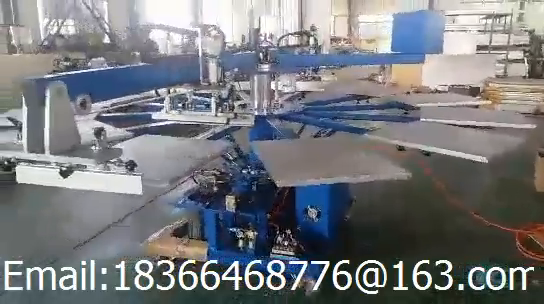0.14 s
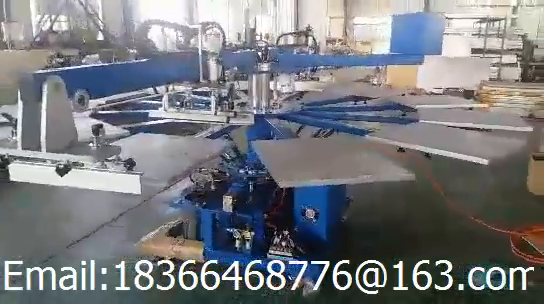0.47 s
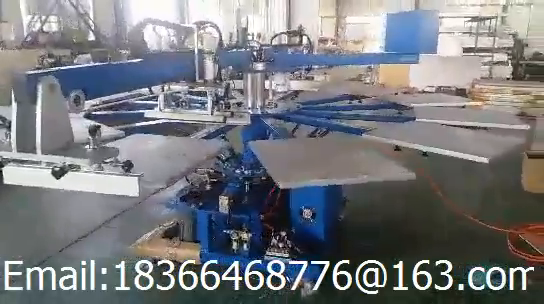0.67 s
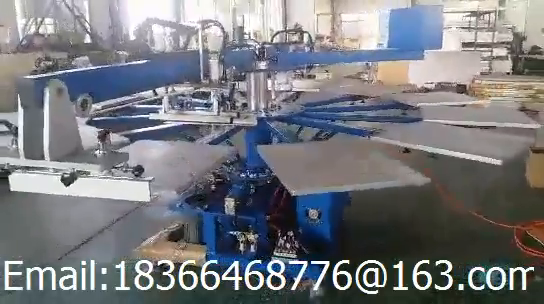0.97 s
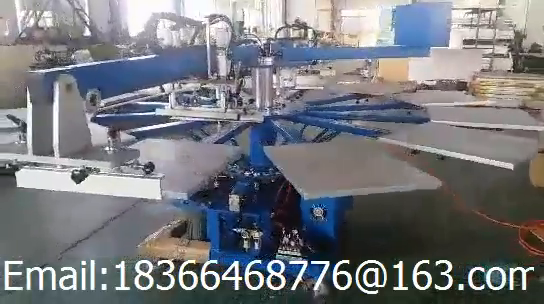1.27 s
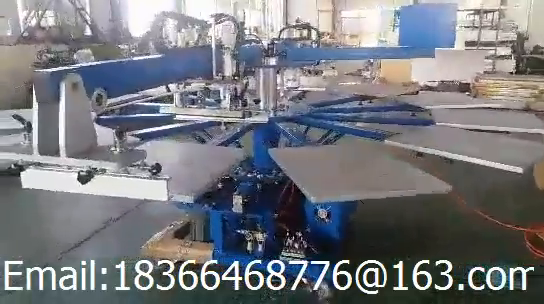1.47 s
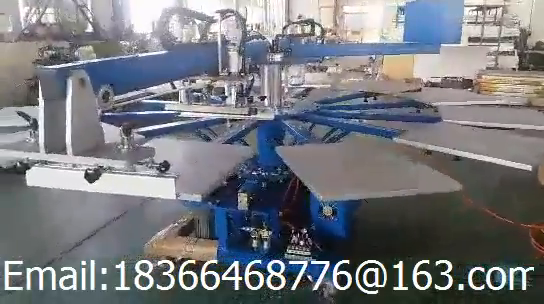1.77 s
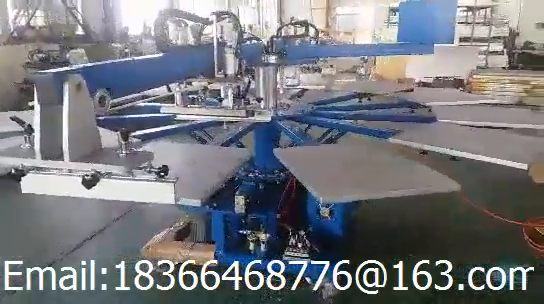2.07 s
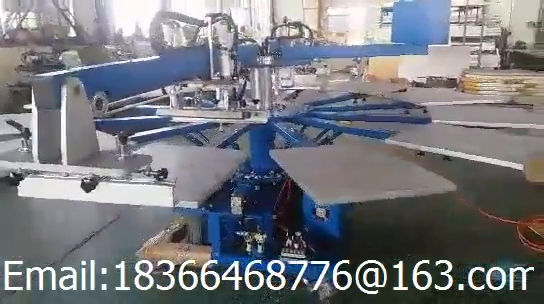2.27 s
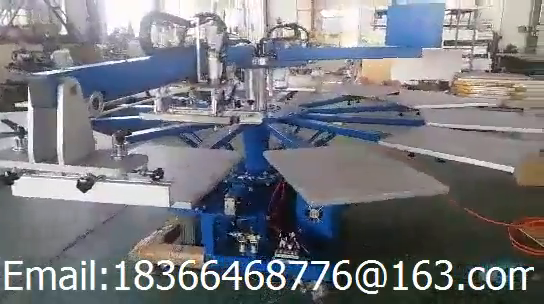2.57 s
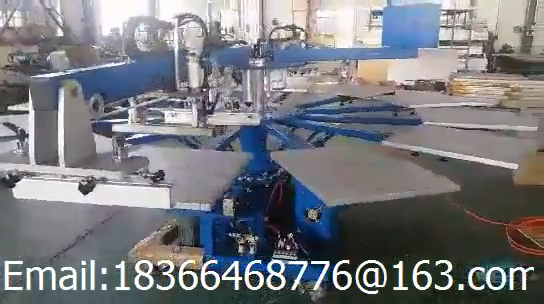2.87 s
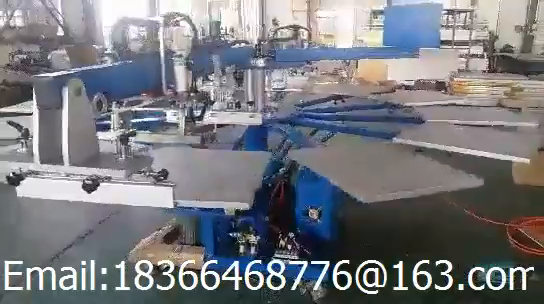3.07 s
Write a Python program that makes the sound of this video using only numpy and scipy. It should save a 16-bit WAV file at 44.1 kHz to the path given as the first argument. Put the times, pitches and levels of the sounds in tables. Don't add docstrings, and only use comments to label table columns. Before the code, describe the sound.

Compressed air from a pneumatic printing carousel bursts out after half a second of workshop roar, fades over about two seconds amid metal clunks, and ends with a sharp air spit; phone a few metres away.

```python
import sys
import numpy as np
from scipy import signal
from scipy.fft import rfft, irfft
from scipy.io import wavfile
from scipy.ndimage import uniform_filter1d, minimum_filter1d

SR = 44100
rng = np.random.default_rng(int(sys.argv[2]) if len(sys.argv) > 2 else 0)


def master_out(mix):
    frames = np.transpose(np.atleast_2d(mix))
    ceiling = np.clip(frames, -1, 1)
    pcm = np.round(ceiling * 32767).astype(np.int16)
    wavfile.write(sys.argv[1], SR, pcm)


def boost_factor(decibels):
    exponent = np.asarray(decibels, float) / 20
    return 10 ** exponent


N = 142002
T = np.arange(N) / SR
F = np.fft.rfftfreq(N, 1 / SR) + 1e-3

# start_s, level_db, nozzle_ring_db
JET = [
    (.4935, -19, 10),
    (.503, -18, 1),
    (.9, -19, 2),
    (1.17, -19, -2.5),
    (1.3, -21.5, -1),
    (1.63, -24.5, 1),
    (1.9, -33, -0.5),
    (2.1, -36.5, 3),
    (2.35, -55, -1),
]
NOTCH_HZ, NOTCH_WIDTH_HZ = 9250, 1500


def level(x, db):
    return x * boost_factor(db) / np.sqrt(np.mean(x ** 2))


def curve(table, col=1):
    points = np.array(table)
    return np.interp(T, points[:, 0], points[:, col])


def slope(table):
    points = np.array(table)
    return boost_factor(np.interp(np.log(F), np.log(points[:, 0]), points[:, 1]))


def ring(hz, width):
    return 1 / (1 + 2j * (F - hz) / width)


def ring_bank(modes):
    return sum(boost_factor(db) * ring(hz, width) for hz, width, db in modes)


def shape(x, gain):
    return irfft(rfft(x) * gain, N)


def walk(rate):
    k = int(SR / rate)
    steps = np.repeat(rng.standard_normal(N // k + 1), k)
    return 1.4 * uniform_filter1d(uniform_filter1d(steps, k), k)[:N]


def pair(alike_hz):
    mid, side = rng.standard_normal((2, N))
    side = shape(side, np.clip(F / alike_hz, .35, 1))
    return np.array([mid + side, mid - side])


def flicker(x, own_db, rate, all_db):
    out, swell = 0, walk(2.73)
    octave = np.clip(np.log2(F), 6, 14)
    for centre in np.arange(6, 15):
        band = np.clip(1 - np.abs(octave - centre), 0, 1)
        out = out + shape(x, band) * boost_factor(own_db * walk(rate) + all_db * swell)
    return out


def place(x, wet_db):
    # frequency_hz, left_lead_rad
    port_phase = [(500, 1.4), (2100, 0.74), (3100, 1.61), (5800, 1.2), (8600, 1.38), (10000, 4.44),
                  (13500, 7.5), (15800, 7.6)]
    t = T[:SR]
    noise = rng.standard_normal((2, 2, SR))
    dull = signal.lfilter([.25], [1, -.75], noise[0])
    tail = 2 * dull * boost_factor(-60 * t / 1) + noise[1] * boost_factor(-60 * t / .88)
    tail = tail * np.clip(t / .004, 0, 1)
    tail = tail / np.sqrt(np.sum(tail ** 2) / 2)
    wet = signal.fftconvolve(x[None], tail, axes=1)[:, :N]
    hz, lead = np.array(port_phase).T
    turn = np.exp(.5j * np.interp(np.log(F), np.log(hz), np.unwrap(lead)))
    return np.array([shape(x, turn), shape(x, 1 / turn)]) + boost_factor(wet_db) * wet


def hall():
    # frequency_hz, level_db (per Hz)
    hall_colour = [(60, -32.5), (692, -5.5), (742, -11), (1100, -10), (1720, -11.5), (4800, -28.5),
                   (9400, -34), (12700, -26), (15700, -26.5)]
    # start_s, level_db
    hall_level = [
        (0, -32),
        (.2, -29.5),
        (.49, -28.5),
        (.53, -36),
        (1.1, -30.5),
        (1.4, -30.5),
        (2.2, -27),
        (2.6, -28.5),
        (2.85, -29),
        (3.22, -30.5),
    ]
    # frequency_hz, width_hz, level_db
    hall_rings = [(1322, 80, 2.5), (1827, 170, -1.5), (2200, 64, -1.5), (892, 68, 3)]
    roar = level(shape(pair(890.0), slope(hall_colour)), 0)
    roar = roar + level(shape(pair(990.0), ring_bank(hall_rings)), -4)
    return flicker(roar, 1.24, 9.23, 0.15) * boost_factor(curve(hall_level))


def leak():
    # start_s, level_db, pitch_hz
    leak_course = [
        (0, -37, 11200),
        (.2, -35, 11250),
        (.5, -34.5, 11080),
        (1.9, -40.5, 11880),
        (2.15, -57, 12030),
        (3.22, -49, 12800),
    ]
    turn = 2 * np.pi * np.cumsum(curve(leak_course, col=2)) / SR

    def slow(width_hz):
        return level(shape(pair(3000.), np.exp(-(F / width_hz) ** 2)), 1.5)

    def band(width_hz):
        return slow(width_hz) * np.cos(turn) + slow(width_hz) * np.sin(turn)

    core, skirt = band(270), band(2500)
    return (core + boost_factor(1.5) * skirt) * boost_factor(curve(leak_course) + 0.27 * walk(27.0)) / 2


def hum():
    # pitch_hz, width_hz, level_db, start_s, end_s
    hum_tones = [
        (552, 20, -42, -1, 4),
        (649, 4, -36.5, 1.33, 2.42),
        (649, 12, -45, -1, 1.33),
        (649, 6, -42, 2.42, 4),
        (731, 4, -35, 2.77, 3.2),
        (788, 8, -46, -1, 4),
        (414, 5, -52, -1, 4),
        (300, 8, -53, -1, 4),
    ]
    out = 0
    for hz, width, db, start, end in hum_tones:
        phase = 2 * np.pi * np.cumsum(hz + width / 3 * walk(30.)) / SR
        tone = np.sin(phase + np.array([[0], [.6]])) * boost_factor(3 * walk(20.))
        out = out + level(tone, db) * np.clip((T - start) / 0.089, 0, 1) * np.clip((end - T) / 0.045, 0, 1)
    return out


def jet():
    # frequency_hz, level_db (per Hz)
    jet_colour = [(290, -64), (500, -39), (553, -28), (903, -34), (985, -20), (2240, -5.5), (3610, -7),
                  (8440, -8), (15700, -9)]
    # frequency_hz, width_hz, level_db
    jet_rings = [(2000, 107, 0), (2250, 103, 3.5), (3210, 184, 2.5), (4180, 250, -5), (6390, 490, -2),
                 (7290, 150, -8), (8270, 67, -7), (8300, 110, -17), (10000, 270, -8), (11200, 690, -2.5),
                 (12400, 300, -7), (14000, 500, -5.5)]
    # frequency_hz, width_hz
    jet_dips = [(3660, 240), (4900, 460), (6950, 200), (7600, 150)]
    air = rng.standard_normal(N) * boost_factor(1 * walk(900.))
    broad = level(shape(air, slope(jet_colour) * np.clip(F / 900., 0, 1) ** 4), 0)
    rings = level(shape(air, ring_bank(jet_rings)), -7)
    gate = np.clip((T - JET[0][0]) / 0.0087, 0, 1) ** 2 * np.clip((JET[-1][0] - T) / .1, 0, 1)
    x = flicker(broad + rings * boost_factor(curve(JET, col=2)), 0, 11.0, 0.26)
    x = place(x * boost_factor(curve(JET)) * gate, -4)
    for hz, width in jet_dips:
        depth = np.clip(.33 * (1 + .5 * walk(16)), 0, .95)
        x = x - depth * shape(x, np.abs(ring(hz, width)) ** 2)
    return x


def whistle():
    x = level(shape(pair(3700.0), ring(8600, 2100) ** 2), -25) * boost_factor(1.2 * walk(13.4))
    gate = np.clip((T - JET[0][0]) / 0.007, 0, 1) * np.clip((1.245 - T) / 0.15, 0, 1)
    pan_db = np.array([[.5], [-.5]]) * 7
    return x * gate * boost_factor(pan_db)


def clunks():
    # start_s, level_db, colour_hz, ring_t60_s, treble_db
    blows = [(1.042, -11, 1250, 0.047, -30), (1.197, -20.5, 1690, 0.11, -33),
             (1.365, -19.5, 1830, 0.089, -22), (1.363, -24.5, 620, 0.084, -38),
             (1.393, -21, 1790, 0.033, -30), (1.059, -24, 1930, 0.041, -30), (2.084, -29, 2500, 0.11, -7),
             (2.094, -21.5, 1510, 0.065, -2.5), (2.097, -23, 2800, 0.06, 0),
             (2.113, -25.5, 2000, 0.052, -6), (2.174, -23, 2500, 0.077, -26), (2.276, -16, 1970, 0.13, -14),
             (2.284, -18, 2200, 0.1, -18), (2.305, -21, 1890, 0.06, -36), (2.347, -30.5, 1310, 0.15, -13),
             (2.39, -28, 1590, 0.17, -18), (2.6538, -16, 950, 0.037, 4), (2.657, -21.5, 2400, 0.086, 5),
             (2.668, -19, 2780, 0.046, -1), (2.672, -25, 1200, 0.054, 2), (2.678, -35, 2200, 0.34, 7)]
    # frequency_hz, level_db, t60_s (not used: each blow sets its own decay)
    frame_modes = [(956, -8, 0.43), (1187, -27, 0.18), (1630, -7, 5.0), (1790, 1, 0.28), (1982, 0, 0.52),
                   (2174, -5, 0.32), (2400, -15.5, 0.33), (2300, -3, 0.41), (2596, -1, 1.2),
                   (2860, 0, 0.13), (3030, 0, 0.12), (3234, 12, 1.0), (3650, -78, 0.51), (3740, -39, 0.22)]
    # frequency_hz, width_hz, level_db
    spit_rings = [(3160, 150, 13), (5426, 150, 16.5), (6500, 200, 2), (9280, 330, 7.5), (10670, 430, 8.5),
                  (11900, 180, 9.5), (13900, 340, 4)]
    # frequency_hz, width_hz
    spit_dips = [(4100, 550), (7050, 380)]
    out, t = np.zeros(N + SR), T[:SR // 2]
    hz = np.fft.rfftfreq(len(t), 1 / SR) + 1

    def peak(f, width):
        return 1 / (1 + (2 * (hz - f) / width) ** 2)

    dips = np.prod([1 - 0.74 * peak(f, w) for f, w in spit_dips], axis=0)
    spit_gain = 1 + sum(boost_factor(d) * peak(f, w) for f, w, d in spit_rings)
    spit_gain = spit_gain * np.clip(hz / 2700.0, 0, 1) ** 2 * dips
    for at, db, centre, t60, treble_db in blows:
        noise, phase = rng.standard_normal((2, len(t))), rng.random(len(frame_modes))
        width_oct = max(0.86 + 0.05 * (db + 10.5), .3)

        def colour(f):
            return np.exp(-.5 * (np.log2(f / centre) / width_oct) ** 4)

        decay = boost_factor(-60 * t / t60)
        modes = 0
        for (f, d, _), p in zip(frame_modes, phase):
            shifted_hz = f * (1 + 0.0304 * np.sin(40 * p))
            modes = modes + boost_factor(d / 2) * colour(f) * np.sin(2 * np.pi * (shifted_hz * t + p))
        skirt = boost_factor(-12.5) * np.clip(hz / centre, 0, (centre / hz) ** 1.3)
        rattle = irfft(rfft(noise[0]) * (colour(hz) + skirt) * dips * (hz > 480.), len(t))
        spit = irfft(rfft(noise[1]) * spit_gain, len(t))
        hit = (level(modes, 0) + level(rattle, 3)) * np.clip(t / 0.0026, 0, 1) * decay * boost_factor(db)
        hit = hit + level(spit, db + treble_db) * np.clip(t / 0.0013, 0, 1) * decay
        first = int(at * SR)
        out[first:first + len(t)] += hit
    return place(out[:N], -11)


def scene():
    return hall() + leak() + hum() + jet() + whistle() + clunks()


def limiter(x):
    # start_s, look_ahead_s, dip_db
    ducks = [
        (1.042, 0.013, -2.5),
        (2.275, 0.02, -4),
        (2.652, .018, -4),
    ]
    dip_db = 0
    for at, ahead, db in ducks:
        dip_db = dip_db + db * np.clip(np.minimum(T - at + ahead, at - T + .002) / 0.0027, 0, 1)
    return x * boost_factor(dip_db)


def spectral_gate(x):
    # frequency_hz, level_db (relative to the frame)
    band_floor = [(3000, -42), (5000, -38), (7000, -37), (9500, -38), (12000, -41), (16000, -42)]
    f, _, s = signal.stft(x, SR, window="cosine", nperseg=2048, noverlap=1024)
    power = np.abs(s) ** 2

    treble_db = 10 * np.log10(np.sum(power[0, 350:450], axis=0) + 1e-9)
    chance = np.repeat(rng.standard_normal(len(treble_db)), 2)[:len(treble_db)]
    under_db = treble_db - np.percentile(treble_db, 85)
    down_oct = np.clip(under_db / 3.5, -1.3, 0) + np.minimum(under_db + 14, 0) / 6.5
    down_oct = np.clip(down_oct, np.log2(76 / 430), 0)
    cut_hz = 430 * 2 ** (down_oct + .5 * (.55 - down_oct) * np.clip(chance, -1.6, .4))
    keep = np.clip((f[:, None] - cut_hz) / 20.0, boost_factor(-45), 1)

    bands_db = 10 * np.log10(power[:, :1024].reshape(2, 64, 16, -1).sum(axis=2) + 1e-12)
    hz = f[8:1024:16]
    frame_db = 10 * np.log10(minimum_filter1d(power.sum(axis=(0, 1)), size=5))
    frame_db = .8 * (frame_db + 17) - 17
    floor_db = frame_db + np.interp(hz, *np.array(band_floor).T, left=-99)[:, None]
    in_notch = np.abs(hz - NOTCH_HZ) < NOTCH_WIDTH_HZ * .7
    floor_db = floor_db + 13 * np.outer([0, 1], in_notch)[..., None]
    floor_db = floor_db + 2.2 * rng.standard_normal(bands_db.shape)
    alive = np.pad(np.repeat(bands_db > floor_db, 16, axis=1), ((0, 0), (0, 1), (0, 0)))

    near = np.abs(s.sum(axis=0, keepdims=True)) ** 2
    near = uniform_filter1d(uniform_filter1d(near, 7, axis=1), 2, axis=2)
    around = np.exp(uniform_filter1d(np.log(near + 1e-14), 61, axis=1))
    alive = alive & ((near > boost_factor(2 * -3.5) * around) | (f < 2500)[:, None])
    kept = s * keep * alive * (f < 15750)[:, None]
    return signal.istft(kept, SR, window="cosine", nperseg=2048, noverlap=1024)[1][:, :N]


def empty_frames(x):
    # start_s, end_s, lowest_hz, highest_hz
    treble_gap = (2.634, 2.641, 3800, 12000)
    start, end, low, high = treble_gap
    gate = np.clip(np.minimum(T - start, end - T) / .0015, 0, 1)
    return x - gate * shape(x, (F > low) & (F < high))


def low_pass(x):
    return signal.sosfilt(signal.butter(12, 16860, fs=SR, output="sos"), x)


def record(dry):
    # frequency_hz, left_minus_right_db
    ports = [(100, -0.5), (700, 1), (2300, -4.5), (4400, 0.5), (6500, -2.5), (8800, 7.5), (10500, 1.5),
             (15000, -3)]
    half = np.sqrt(slope(ports))
    low_cut = F ** 2 / (F ** 2 + 62 ** 2)
    notch = 1 - .88 * np.abs(ring(NOTCH_HZ, NOTCH_WIDTH_HZ)) ** 2
    left = shape(dry[0], half * low_cut)
    right = shape(dry[1], notch * low_cut / half)
    mix = np.tanh(np.array([left, right]))
    mix = empty_frames(spectral_gate(limiter(mix)))
    return low_pass(mix)


dry = scene()
out = record(dry)
master_out(out)
```